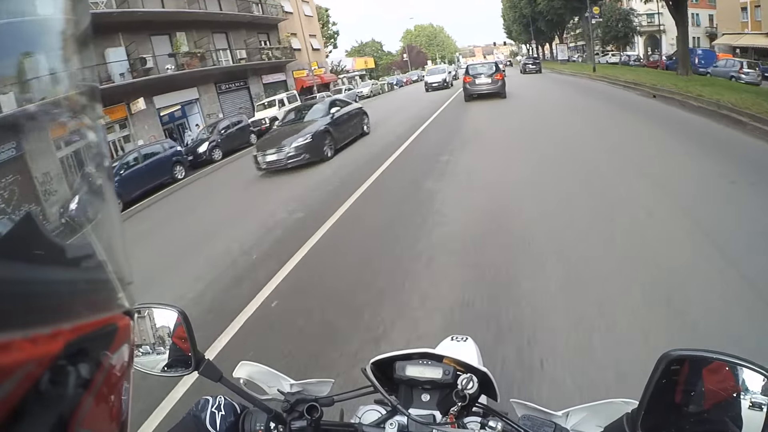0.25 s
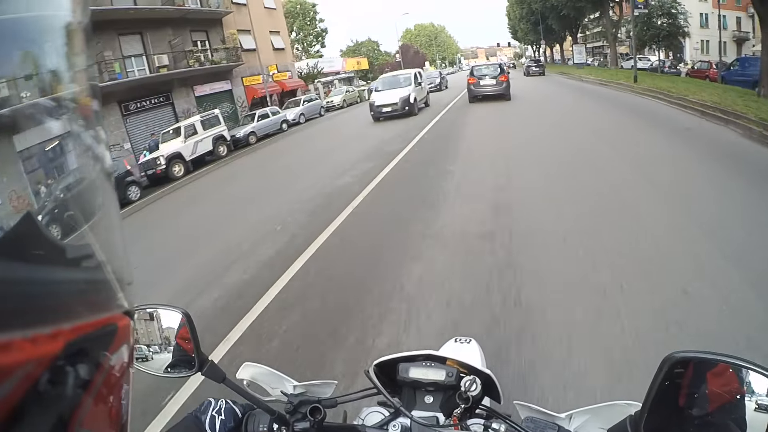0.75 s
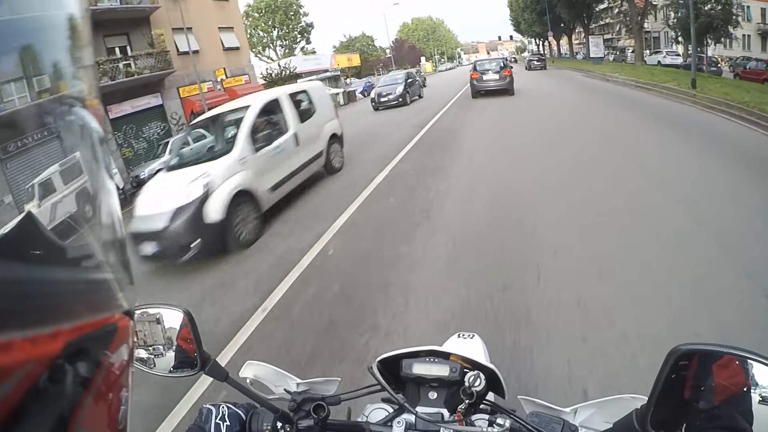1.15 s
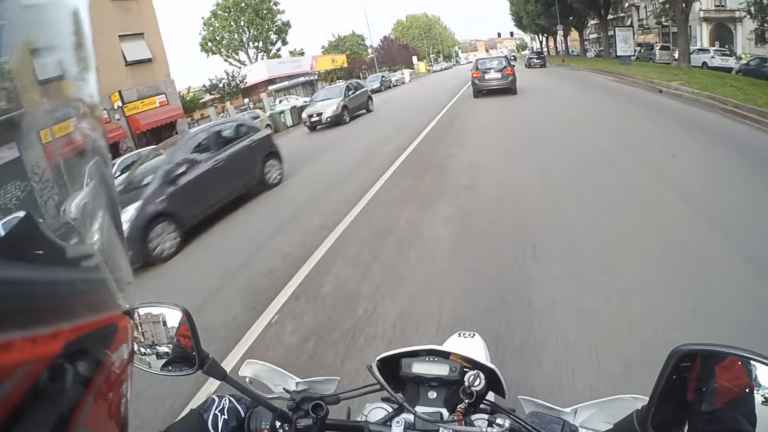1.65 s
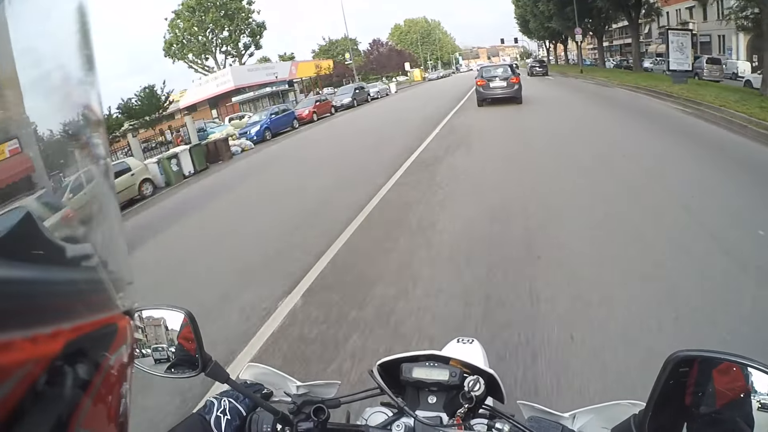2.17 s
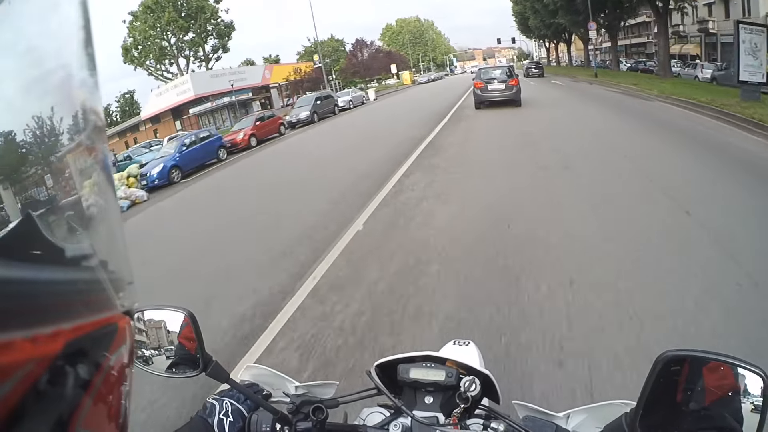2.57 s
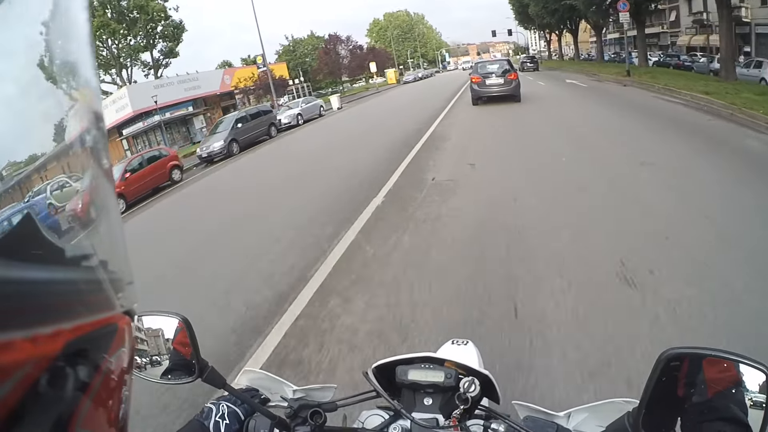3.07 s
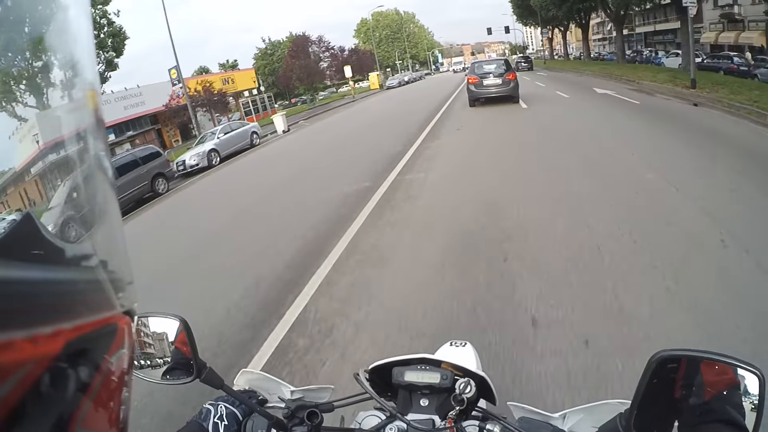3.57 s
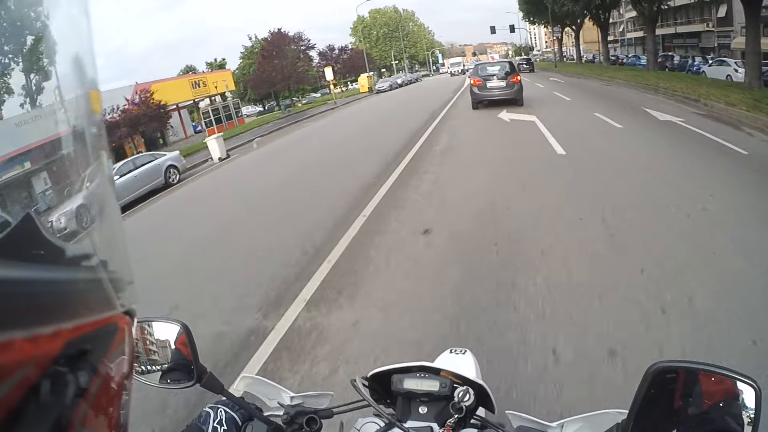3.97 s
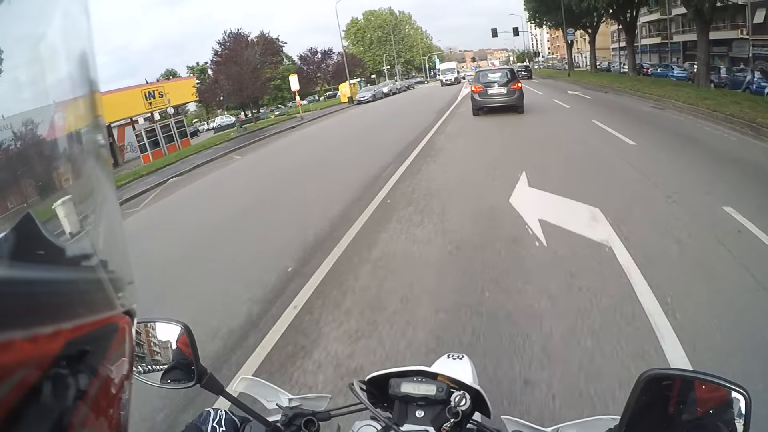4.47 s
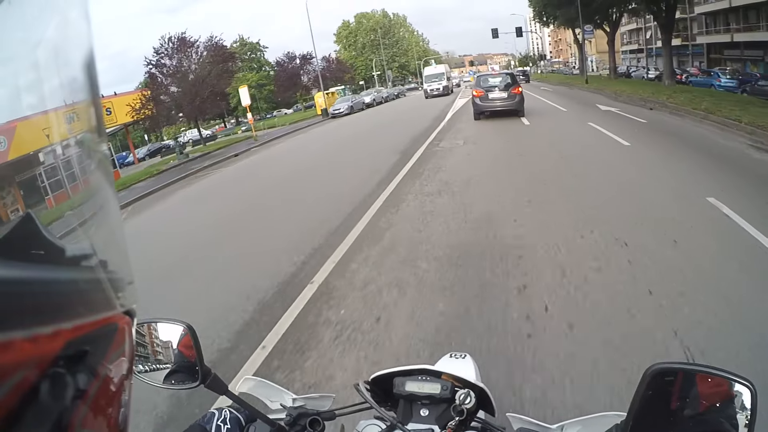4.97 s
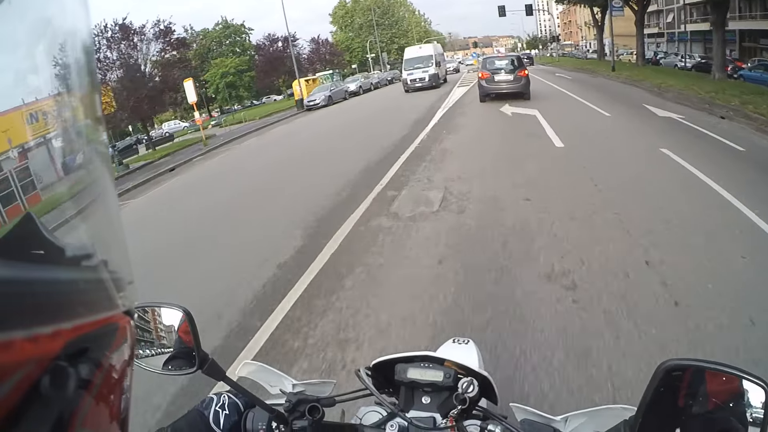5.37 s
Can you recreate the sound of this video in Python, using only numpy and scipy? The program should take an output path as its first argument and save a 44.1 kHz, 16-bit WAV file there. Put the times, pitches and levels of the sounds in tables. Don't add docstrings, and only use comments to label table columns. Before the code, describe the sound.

A small motorcycle drones steadily, throttle shuts off, a faint brake squeal and downshift blip follow, then revs climb, all under buffeting wind.

```python
import sys
import numpy as np
from scipy import signal
from scipy.fft import rfft, irfft, next_fast_len
from scipy.io import wavfile
from scipy.ndimage import uniform_filter1d, map_coordinates

SR = 44100
rng = np.random.default_rng(int(sys.argv[2]) if len(sys.argv) > 2 else 0)


def wrap_up_sound(samples):
    columns = np.atleast_2d(samples).T
    tamed = np.clip(columns, -1, 1)
    steps = np.round(tamed * 32767).astype(np.int16)
    wavfile.write(sys.argv[1], SR, steps)


def undo_db(level):
    steps = np.asarray(level, float) / 20
    return 10 ** steps


N = 247842

CRUISE_HZ = 46.69

# (time [s], firing rate [Hz])
FIRING_RATE = [(0.0, 45.46), (1.2, 46.65), (2.4, 47.82), (2.72, 47.82), (2.82, 46.17), (2.9, 45.29),
               (3.0, 47.37), (3.1, 46.46), (3.45, 46.0), (3.85, 44.1), (4.25, 41.85), (4.45, 38.33),
               (4.85, 31.06), (4.96, 29.8), (5.05, 30.19), (5.15, 32.2), (5.45, 39.74), (5.62, 44.61)]
# (time [s], level [dB])
COMBUSTION = [
    (0, -26.5),
    (1.2, -27),
    (2.765, -28.5),
    (2.8, -54),
    (3.0, -46),
    (4.3, -61),
    (4.55, -42),
    (4.9, -41.5),
    (5.1, -43),
    (5.62, -55),
]
# (time [s], level re cruise [dB])
SPEED = [(0, 0), (1.35, .5), (2.0, -.5), (2.9, -0.5), (3.4, -1.5), (3.85, -3), (4.5, -5), (5.0, -6.5),
         (5.4, -5.5), (5.62, -2.5)]
# (multiple of cruise rate [1], gain [dB])
PIPE_COLOUR = [(1, -6.5), (2, -8), (3, -10), (4, -6), (5, 2), (6, -1.5), (7, -7.5), (8, -12.5), (9, -5),
               (10, -22.5), (11, -13.5), (12, -14.5), (13, -20), (14, -25)]
# (frequency [Hz], delay [ms])
PIPE_LAG = [(190, 2.2), (255, 5.5), (320, 7.5), (350, 16), (385, 5.7), (440, 3.4), (490, .5), (540, 3.4)]
# (frequency [Hz], density [dB per Hz])
RASP = [(90, -39.5), (150, -2.5), (230, -1), (330, -4.5), (450, -9), (600, -14), (750, -24.5), (1500, -84)]
# (middle [s], length [s], gain [dB])
BACKFIRE = [
    (2.8, 0.29, 3),
    (4.75, .4, 1),
    (5.1, 0.34, 0.5),
]
# (order [1], level [dB])
GEARS = [(17, -60), (18, -59), (19, -66), (21, -65), (22, -61.5), (23, -59.5), (24, -60.5), (29, -67),
         (31, -63), (32, -65.5), (35, -76)]
# (order [1], level [dB], gain per octave slower [dB])
PUMPING = [(2, -7.5, 2), (3, -8.5, 3), (4, 2, 0), (5, -40, 0), (6, -5.5, -19.5), (7, -17, 21), (8, -8, -2),
           (9, -10, -8.5), (10, -17.5, 5), (11, -20, -2), (12, -20.5, 5), (13, -20.5, 0.5), (14, -22, 1)]
# (time [s], level [dB])
SUCTION = [(2.76, -7), (2.8, -3), (2.865, -1.5), (2.92, 1), (3.04, -2.5), (3.3, -1.5), (3.6, 1), (4.0, 0.5),
           (4.3, 0.5), (4.6, -1.5), (4.9, -5.5), (5.1, 0), (5.25, -1.5), (5.4, 0.5), (5.62, -0.5)]
# (frequency [Hz], gain [dB])
FRAME = [(130, -5), (180, 3.5), (220, -1.5), (280, 2.5), (400, 0), (480, -1), (558, 7.5), (640, -9)]
# (frequency [Hz], level [dB])
MOUNT = [(119, -43.5), (135, -41.5), (150, -36), (168, -35.5), (185, -37.5)]
# (middle [s], length [s], gain [dB])
LURCH = [
    (2.85, .22, 4),
    (2.93, .06, 2),
    (2.985, .07, -15),
    (3.04, .05, 2),
]
# (frequency [Hz], density [dB per Hz])
ROAR = [(380, -25), (650, -2), (702, -1), (861, 0), (1310, -6), (1480, -7.5), (1730, -12.5), (2200, -30),
        (2860, -42), (4840, -120)]
# (frequency [Hz], density [dB per Hz])
HISS = [(1120, -22.5), (1900, 1), (2120, 0.5), (2310, 0), (2750, -2), (3100, 4), (3970, -4.5), (4250, -1),
        (5600, -6), (7280, -42), (12300, -120)]
# (frequency [Hz], density [dB per Hz])
AIR = [(3240, -34), (5500, -16), (6120, 1.5), (6700, -2.5), (7610, -4.5), (8220, -8), (12000, -10.5),
       (14500, -12), (15300, -14)]
# (centre [Hz], width [Hz], gain [dB])
CASING = [(1430, 5.7, 11), (2563, 19, 6.5), (3170, 64, -4.5), (3775, 60, 5.5), (3960, 50, 9),
          (4540, 22, 0.5), (5950, 93, 8), (6940, 40, -5), (7780, 42, 3.5), (9600, 50, 6), (10900, 60, 6),
          (11800, 60, 8)]
# (middle [s], length [s], gain [dB])
JOLTS = [(.65, .1, 1.5), (1.41, 0.2, 1.5), (2.97, 0.072, 0.5), (3.085, 0.045, 3.5), (4.537, .05, 7.5)]
# (start [s], end [s], start pitch [Hz], end pitch [Hz], level [dB])
SQUEAL = [(1.72, 2.75, 4050, 4070, -70.5), (2.92, 3.3, 4030, 4030, -69.5), (4.95, 5.3, 4700, 4620, -78),
          (3.0, 3.12, 4400, 4440, -75), (3.7, 4.3, 3250, 3150, -76), (3.86, 4.46, 4180, 3990, -72),
          (4.02, 4.44, 4510, 4340, -73.5), (4.4, 4.7, 3910, 3850, -73), (4.43, 5.07, 4500, 4410, -74),
          (4.55, 4.9, 4720, 4680, -78), (4.75, 5, 4860, 4800, -78), (4.58, 4.92, 4290, 4190, -78),
          (4.7, 4.95, 3100, 3050, -78), (5.05, 5.42, 4140, 4020, -73), (5.07, 5.4, 4520, 4430, -74)]
# (time [s], peak level [dB])
CHATTER = [(3.765, -70), (3.82, -68), (3.8755, -69), (3.9125, -65), (3.9289, -61), (3.9688, -58),
           (3.984, -60), (4.0038, -61), (4.0596, -62), (4.078, -62), (4.118, -55), (4.1484, -56),
           (4.2, -57), (4.225, -64), (4.2692, -53), (4.2976, -60), (4.3111, -55), (4.351, -57),
           (4.3784, -61), (4.4213, -56), (4.4637, -61), (4.4926, -65)]
# (time [s], level [dB])
RUB = [
    (3.74, -91),
    (3.8, -80),
    (3.95, -78),
    (4.3, -68),
    (4.47, -82),
    (4.52, -88),
]
# (centre [Hz], width [Hz], gain [dB])
DISC = [(12130, 700, 2), (13540, 820, 6), (14500, 700, -6)]
# (time [s], length [s], pitch [Hz], level [dB])
SQUEAKS = [(2.985, .03, 4050, -72), (3.037, 0.057, 4040, -66), (3.14, .045, 2370, -61),
           (3.625, .035, 5200, -66), (4.465, .015, 12000, -69), (4.49, .014, 12000, -70),
           (4.52, 0.042, 743, -50.5), (4.92, .025, 2590, -68), (5.08, 0.015, 4100, -67),
           (5.187, 0.047, 1235, -59)]
# (middle [s], length [s], peak level [dB])
GUSTS = [(.06, 0.48, -23), (.49, 0.41, -22.5), (.85, 0.48, -36), (1.23, 0.17, -18), (1.39, 0.07, -25.5),
         (1.57, .26, -37), (1.78, 0.05, -21.5), (1.96, 0.29, -27), (2.22, 0.69, -33.5), (2.55, 0.24, -19),
         (2.75, 0.21, -40), (3.1, 0.35, -23.5), (3.53, 0.35, -22), (3.77, 0.21, -23), (3.99, 0.27, -23),
         (4.24, 0.29, -27), (4.46, 0.2, -27.5), (4.66, 0.058, -28), (4.79, 0.077, -28.5),
         (4.98, 0.39, -30.5), (5.22, 0.26, -28.5), (5.52, 0.17, -36)]
# (middle [s], length [s], gain over flutter [dB])
EDDIES = [(0, 0.17, -2), (.15, .12, -3), (1.1, 0.1, -5), (2.2, 1, 5.5), (2.85, 0.24, 5), (2.93, 0.056, -6),
          (3.02, 0.072, 4), (3.2, 0.3, 3.5), (3.3, 0.082, 0), (3.55, 0.48, 3), (3.88, 0.065, 12.5),
          (4.13, .12, 4), (4.24, .1, -5), (4.36, 0.093, 6.5), (4.79, 0.045, 10.5), (5.0, .12, -8),
          (5.06, 0.088, -7)]
# (frequency [Hz], density [dB per Hz])
BUFFET = [(1, -2), (3, 4.5), (14, -3), (25, -8.5), (40, -18.5), (80, -45.5), (200, -57), (600, -78),
          (2000, -120)]
# (frequency [Hz], density [dB per Hz])
FLUTTER = [(15, -46), (35, 0), (60, -4.5), (100, -7), (160, -12.5), (250, -37.5), (500, -29.5), (1500, -89)]
# (start [s], length [s])
TOP_BAND_GAPS = [(2.56, .04), (2.875, .02), (3.06, .08), (3.47, .09), (3.735, .03), (4.635, .03),
                 (4.78, .025), (4.86, .035), (4.98, .1), (5.175, .055), (5.43, .075)]


def unit(x):
    return x / np.sqrt(np.mean(x ** 2) + 1e-20)


def along(points, hz):
    f, v = np.transpose(points)
    return np.interp(np.log(hz + 1), np.log(f + 1), v)


def curve(rows):
    s, value = np.transpose(rows)
    return np.interp(np.arange(N) / SR, s, value)


def humps(rows):
    s, span, db = np.transpose(rows)[..., None]
    return np.cos(np.pi * np.clip((np.arange(N) / SR - s) / span, -.5, .5)) ** 2, db


def lifted(rows):
    hump, db = humps(rows)
    return (hump * db).sum(axis=0)


def wobble(rate_hz):
    coarse = np.arange(0, N + 32, 32)
    knots = rng.standard_normal(2048)
    return np.interp(np.arange(N), coarse, map_coordinates(knots, [coarse * rate_hz / SR]))


def filtered(x, response):
    m = 2 * next_fast_len(N // 2 + SR // 4)
    return irfft(rfft(x, m) * response(np.fft.rfftfreq(m, 1 / SR)), m)[..., :N]


def rush(spectrum, patchy_db):
    z = signal.stft(rng.standard_normal(N + 512), nperseg=512)[2]
    field = uniform_filter1d(rng.standard_normal(z.shape), size=6, axis=0)
    field = uniform_filter1d(field, size=10, axis=1)
    noise = signal.istft(z * undo_db(patchy_db * unit(field)), nperseg=512)[1][:N]
    return unit(filtered(noise, lambda hz: undo_db(along(spectrum, hz))))


def pipe(hz):
    chamber_hz = 165
    colour = [(5, -50)] + [(k * CRUISE_HZ, db) for k, db in PIPE_COLOUR] + [(750, -55.5), (3000, -100)]
    gain = -undo_db(along(colour, hz)) * np.tanh((hz - chamber_hz) / 10)
    lag_s = along(PIPE_LAG, hz) / 1000
    turns = np.cumsum(lag_s) * hz[1]
    return gain * np.exp(-2j * np.pi * turns)


def exhaust(cycle):
    at = np.flatnonzero(np.diff(np.floor(cycle), prepend=-1))
    blows = np.zeros(N)
    blows[at] = undo_db(0.23 * rng.standard_normal(len(at)))
    rasp_db = -40.5 + 0.7 * curve(SPEED) + lifted(BACKFIRE)
    rasp = unit(undo_db(0.97 * np.cos(2 * np.pi * cycle - 1.6)) * rush(RASP, patchy_db=2.5))
    return undo_db(curve(COMBUSTION)) * unit(filtered(blows, pipe)) + undo_db(rasp_db) * rasp


def gulp():
    start_s, length_s, from_hz, to_hz, level_db = 2.76, .06, 245, 180, -32
    u = np.clip((np.arange(N) / SR - start_s) / length_s, 0, 1)
    phase = 2 * np.pi * np.cumsum(from_hz + (to_hz - from_hz) * u) / SR
    return undo_db(level_db) * np.sin(np.pi * u) * np.sin(phase)


def pumping(rate_hz, cycle):
    crank_order = 4
    suction_db = curve(SUCTION)
    crank_db = along(MOUNT, crank_order * rate_hz) + 0.18 * suction_db + lifted(LURCH)
    upper_db = -35.5 + suction_db
    octaves_slower = np.log2(CRUISE_HZ / rate_hz)
    unsteady = (CRUISE_HZ / rate_hz) ** 1.75
    pumped = np.zeros(N)
    for k, db, slow_db in PUMPING:
        if k == crank_order:
            path_db, loose = crank_db, .3
        else:
            path_db, loose = upper_db + slow_db * octaves_slower + along(FRAME, k * rate_hz), 1
        turn = k * cycle + 0.55 - 0.086 * k - 0.11 * (k % 2)
        level_db = db + path_db + 1.4 * loose * wobble(14)
        jitter_rad = 0.074 * k * loose * unsteady * wobble(13)
        pumped += undo_db(level_db) * np.cos(2 * np.pi * turn + jitter_rad)
    shut = np.clip((np.arange(N) / SR - 2.76) / .04, 0, 1)
    return shut * undo_db(2.5) * pumped


def gears(cycle):
    whine = np.zeros(N)
    for k, db in GEARS:
        whine += undo_db(db + 2.2 * wobble(4)) * np.cos(2 * np.pi * k * cycle + .7 * wobble(5))
    return undo_db(0.55 * (curve(COMBUSTION) + 27.5)) * whine


def casing(hz):
    return undo_db(sum(db / (1 + (2 * (hz - c) / w) ** 2) for c, w, db in CASING))


def running_noise(cycle):
    speed_db, jolt_db = curve(SPEED), lifted(JOLTS)
    roar_db = -50.5 + 0.73 * speed_db + 0.27 * jolt_db + 0.42 * wobble(5.85)
    hiss_db = -60.5 + 1.07 * speed_db + jolt_db
    air_db = -68.5 + 1.32 * speed_db + .8 * jolt_db
    swell = np.cos(2 * np.pi * cycle - 1.2)
    stroke = np.cos(4 * np.pi * cycle - .6)
    ticking_db = 1.1 * swell + 0.54 * stroke
    roar = unit(undo_db(1.3 * swell) * rush(ROAR, patchy_db=0.5))
    hiss = unit(undo_db(ticking_db + 0.37 * wobble(380)) * rush(HISS, patchy_db=0.55))
    air = unit(undo_db(ticking_db + 0.61 * wobble(300)) * rush(AIR, patchy_db=1.0))
    noise = undo_db(roar_db - 2.5) * roar + undo_db(hiss_db) * hiss + undo_db(air_db - 0.15) * air
    return undo_db(0.5) * filtered(noise, casing)


def engine():
    rate_hz = curve(FIRING_RATE)
    cycle = np.cumsum(rate_hz) / SR
    return exhaust(cycle) + gears(cycle) + pumping(rate_hz, cycle) + running_noise(cycle)


def squeal():
    t, tones = np.arange(N) / SR, np.zeros(N)
    for start, end, from_hz, to_hz, db in SQUEAL:
        glide_hz = np.interp(t, [start, end], [from_hz, to_hz])
        pitch_hz = glide_hz + 5 * wobble(12) + 24 * wobble(110)
        held = np.clip(np.minimum(t - start, end - t) / .03, 0, 1)
        level = held * undo_db(db + .6 + 2.2 * wobble(40))
        tones += level * np.sin(2 * np.pi * np.cumsum(pitch_hz) / SR)
    return tones


def disc(hz):
    response = 0
    for k, (c, w, db) in enumerate(DISC):
        response = response + (-1) ** k * undo_db(db) * 1j * hz * w / (c * c - hz * hz + 1j * hz * w)
    return response ** 2


def chatter():
    slip_db, slip_t60_s, drag_db, drag_t60_s = -3, .02, -6.5, .12
    t, slips = np.arange(N) / SR, np.zeros(N + SR)
    span = 4000
    fading = undo_db(slip_db - 60 * t[:span] / slip_t60_s) + undo_db(drag_db - 60 * t[:span] / drag_t60_s)
    for s, db in CHATTER:
        slips[round(s * SR):][:span] += undo_db(db) * fading * rng.standard_normal(span)
    touching = (t > RUB[0][0]) * (t < RUB[-1][0])
    rubbing = touching * undo_db(curve(RUB) + 3 * wobble(150)) * rng.standard_normal(N)
    return filtered(slips[:N] + rubbing, disc)


def squeaks():
    t, total = np.arange(N) / SR, np.zeros(N)
    for s, span, hz, db in SQUEAKS:
        swell = np.sin(np.pi * np.clip((t - s) / span, 0, 1))
        total += undo_db(db) * swell * np.sin(2 * np.pi * hz * t)
    return total


def wind():
    speed_db = curve(SPEED)
    hump, db = humps(GUSTS)
    lull = undo_db(-28.5 + 1.7 * speed_db)
    buffet = lull + (hump * undo_db(db)).sum(axis=0)
    lumps = unit(np.tanh(rush(BUFFET, patchy_db=1.0)))
    flutter_db = -34 + 0.87 * speed_db + lifted(EDDIES)
    flutter = unit(np.tanh(.4 * rush(FLUTTER, patchy_db=0.0)))
    return buffet * lumps + undo_db(flutter_db) * flutter


def scene():
    mono = engine() + gulp() + squeal() + chatter() + squeaks() + wind()
    return np.tile(mono, (2, 1))


def top_cut(x):
    return signal.sosfilt(signal.butter(12, 15430, fs=SR, output="sos"), x)


def record(dry):
    def top_band(hz):
        return hz > 12800

    t, gaps = np.arange(N) / SR, np.zeros(N)
    for s, span in TOP_BAND_GAPS:
        gaps += np.clip(np.minimum(t - s, s + span - t) / .008 + .5, 0, 1)
    kept = dry - filtered(gaps * filtered(dry, top_band), top_band)
    drift_spectrum = [(1, 6), (20, 4), (60, -5.5), (120, -35.5), (400, -53)]  # (Hz, dB per Hz)
    drift = undo_db(-51.5) * rush(drift_spectrum, patchy_db=1.0)
    mix = kept - .002 + np.array([drift, -drift])
    return top_cut(mix)


dry = scene()
out = record(dry)
wrap_up_sound(out)
```